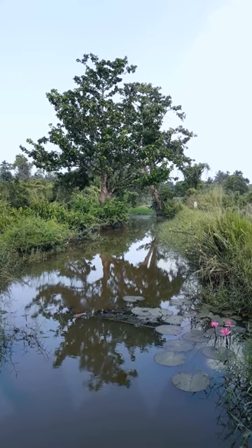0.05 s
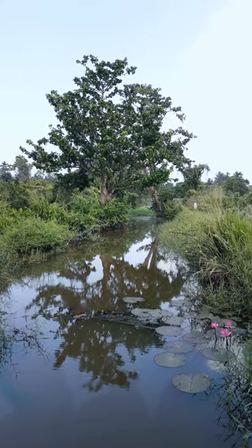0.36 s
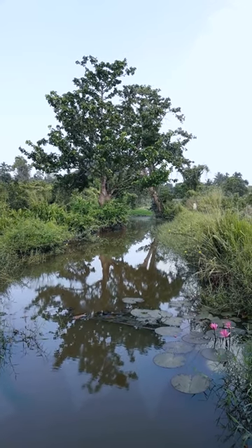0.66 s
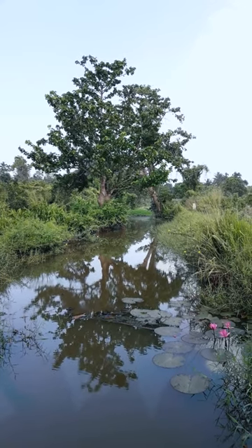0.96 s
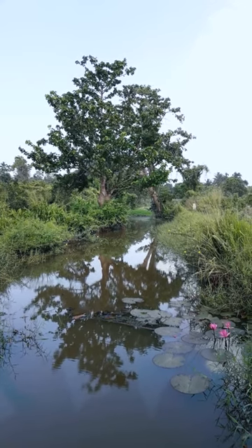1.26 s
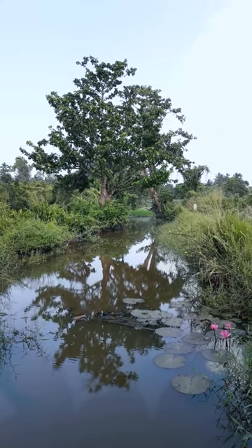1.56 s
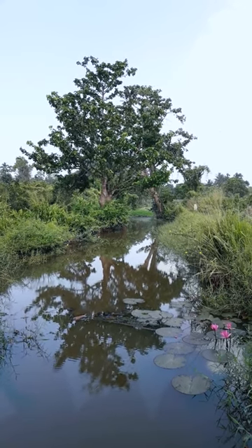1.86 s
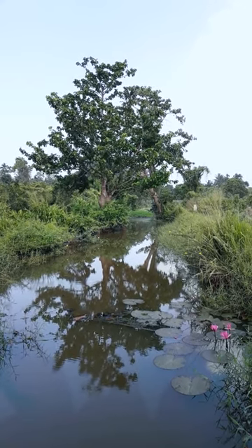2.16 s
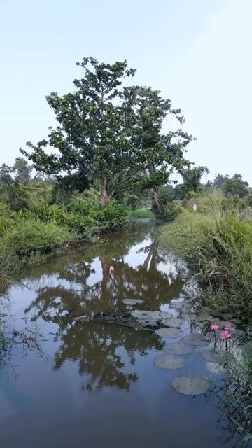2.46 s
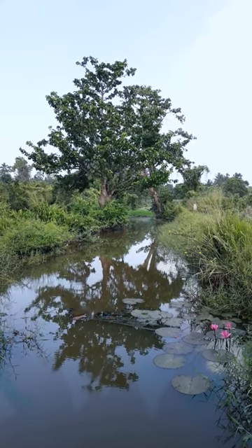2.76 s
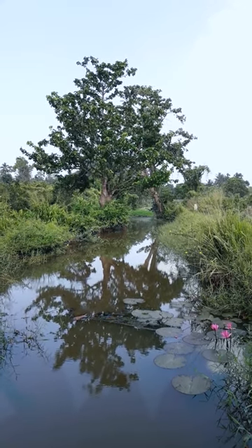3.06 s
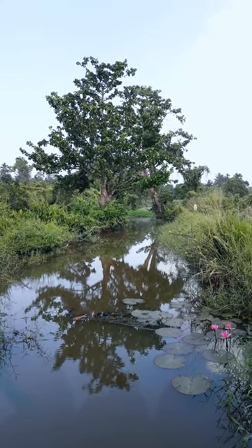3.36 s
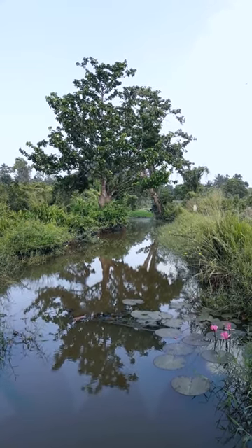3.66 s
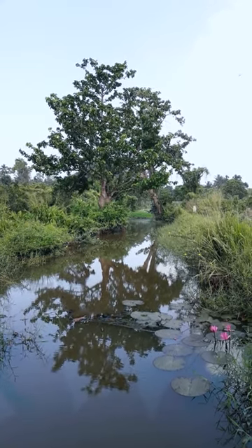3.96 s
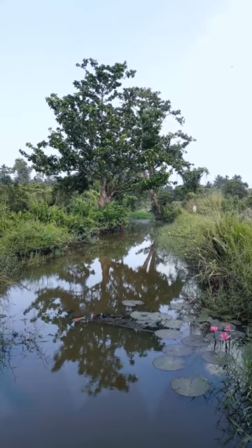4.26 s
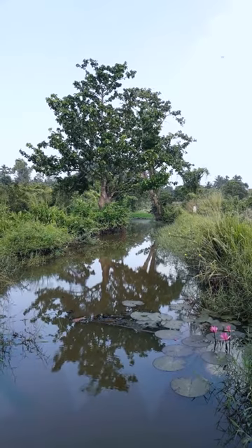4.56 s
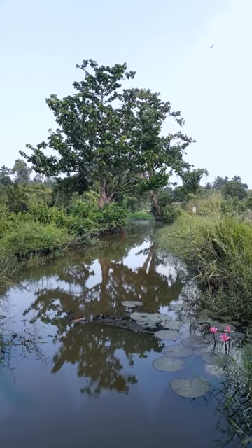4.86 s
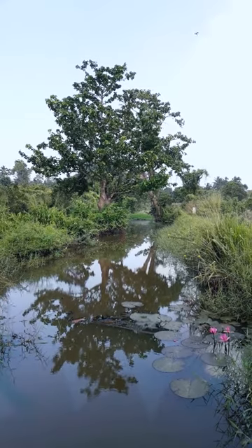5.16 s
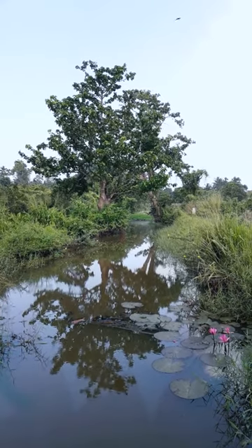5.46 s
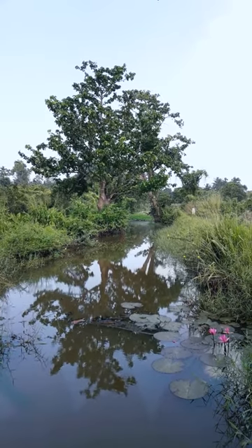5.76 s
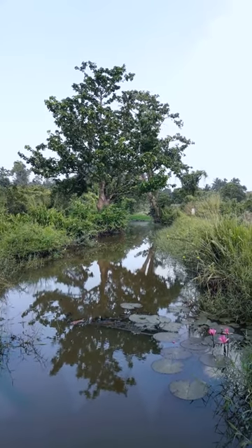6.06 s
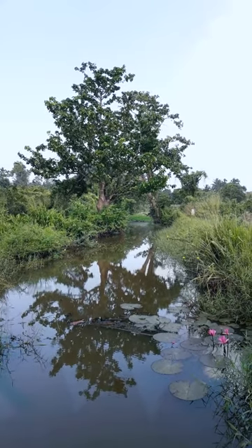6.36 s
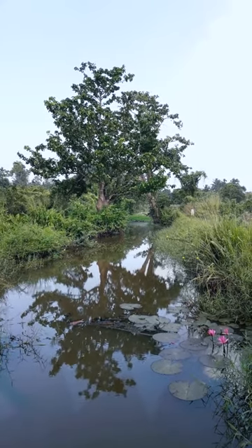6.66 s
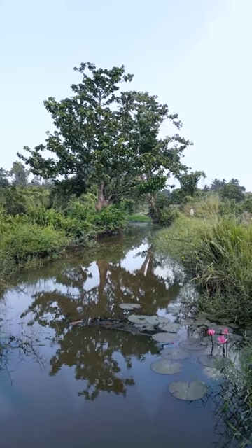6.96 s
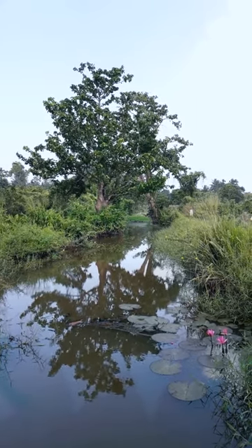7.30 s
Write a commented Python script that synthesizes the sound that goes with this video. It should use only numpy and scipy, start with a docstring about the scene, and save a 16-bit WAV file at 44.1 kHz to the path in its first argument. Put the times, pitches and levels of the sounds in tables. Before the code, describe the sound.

Small birds chirp, chatter and whistle over a steady high insect drone beside a still canal, with a brief grass rustle near the end.

```python
"""A still canal among reeds and trees. Insects drone at 7 kHz throughout, a higher one chirps in pulses,
and small birds peep, twitter and rasp further off. A near bird chatters and a farther one squawks in the
bushes, both with bursts of high hiss. Wood bumps, two slurs fall from distant trees, and the near bird
whistles twice. From 5 s the bush bird repeats rough falling syllables over a far sinking tone, then a far
animal calls hoarsely twice. Last, grass rustles and wood bumps by the microphone. Foliage scatters calls."""
import sys
import numpy as np
from scipy import signal
from scipy.fft import rfft, irfft, next_fast_len
from scipy.io import wavfile
from scipy.ndimage import uniform_filter1d, map_coordinates

SR = 44100
rng = np.random.default_rng(int(sys.argv[2]) if len(sys.argv) > 2 else 0)


def master(y):
    """Save y as 16-bit WAV."""
    cut = np.clip(np.atleast_2d(y).T, -1, 1)
    pcm = np.round(cut * 32767)  # scale
    wavfile.write(sys.argv[1], SR, pcm.astype(np.int16))


N = 327663


def amp(db):
    """Decibels to gain."""
    return 10 ** (np.asarray(db) / 20)


def unit(x):
    """Scale to rms 1."""
    return x / np.sqrt(np.mean(x ** 2) + 1e-20)


def along(points, hz):
    """Read (hz, value) points on a log frequency axis."""
    point_hz, values = np.transpose(points)
    return np.interp(np.log(hz + 1), np.log(point_hz + 1), values)


def clock(length=None):
    """Sample times over a length in seconds, or over the whole scene."""
    return np.arange(N if length is None else int(length * SR)) / SR


def wobble(rate):
    """A smooth random curve, rate knots a second."""
    return map_coordinates(rng.standard_normal(8192), [clock() * rate], order=2, mode="wrap")


def filtered(x, response):
    """Filter x by a gain that depends on frequency."""
    n = x.shape[-1]
    padded = next_fast_len(n + 4096)
    return irfft(rfft(x, padded) * response(np.fft.rfftfreq(padded, 1 / SR)), padded)[..., :n]


def coloured(x, spectrum):
    """x through a (hz, db) spectrum, at rms 1."""
    return unit(filtered(x, lambda hz: amp(along(spectrum, hz))))


def band(centre_hz, width_hz, size):
    """Noise of rms 1 in one bell-shaped band."""
    noise = rng.standard_normal(size)
    return unit(filtered(noise, lambda hz: np.exp(-((hz - centre_hz) / width_hz / 2) ** 2)))


def patchy(depth_db=2.5):
    """White noise with drifting patches of gain."""
    spectra = signal.stft(rng.standard_normal(N), nperseg=512)[2]
    patches = uniform_filter1d(uniform_filter1d(rng.standard_normal(spectra.shape), 4, 0), 16, 1)
    return signal.istft(spectra * amp(depth_db * unit(patches)), nperseg=512)[1][:N]


def add(track, start_s, sound):
    """Mix a sound into a track."""
    part = track[max(round(start_s * SR), 0):][:len(sound)]
    part += sound[:len(part)]


def contour(rows):
    """Start time, pitch and soft-edged gain of one call."""
    times, hz, db = np.transpose(rows)
    t = times[0] + clock(max(times[-1] - times[0], .01))
    pitch = uniform_filter1d(np.interp(t, times, hz), size=300)
    return times[0], pitch, amp(np.interp(t, times, db)) * signal.windows.tukey(len(t), .1)


def repeats(shape, calls):
    """One call shape, moved to each time, length, pitch and level."""
    return [[(start + t * stretch, hz * ratio, db + level) for t, hz, level in shape]
            for start, stretch, ratio, db in calls]


def tone(hz, overtone_db=-30):
    """A gliding sine of rms 1 plus a weaker octave."""
    phase = 2 * np.pi * np.cumsum(hz) / SR
    return np.sqrt(2) * (np.sin(phase) + amp(overtone_db) * np.sin(2 * phase))


def chirp(length, start_hz, middle_hz, end_hz, jitter):
    """One swelling note on an arc through three pitches; fast pitch jitter makes it harsh."""
    progress = np.linspace(0, 1, int(max(length, .005) * SR))
    hz = np.polyval(np.polyfit([0, .5, 1], [start_hz, middle_hz, end_hz], 2), progress)
    shake = np.interp(np.arange(len(progress)) / 50, np.arange(512), rng.standard_normal(512))
    return np.sin(np.pi * progress) * tone(hz * (1 + jitter * shake), overtone_db=-46)


# Decay among the trees on the bank: frequency_hz, t60_s
TREE_DECAY = [(300, 1), (1200, 0.26), (4000, 0.5), (10000, 0.081)]

def foliage(x, wet_db, early_s, late_db, echoes=40):
    """Direct sound, echoes off near trunks and leaves, and a tail; paths change every half second."""
    out, t, hop = x.copy(), clock(.5), SR // 2
    for start in range(0, N, hop):
        hz, when, spectra = signal.stft(rng.standard_normal(len(t)), SR, nperseg=256)
        decay = amp(-60 * when / along(TREE_DECAY, hz)[:, None])
        late = signal.istft(spectra * decay, SR, nperseg=256)[1][:len(t)] * np.minimum(t / .018, 1)
        delays = rng.integers(SR // 250, SR // 12, echoes)
        early = np.bincount(delays, rng.standard_normal(echoes), len(t)) * amp(-60 * t / early_s)
        response = unit(unit(early) + amp(late_db) * unit(late)) / np.sqrt(len(t))
        add(out, start / SR, amp(wet_db) * signal.fftconvolve(x[start:start + hop], response))
    return out / np.sqrt(1 + amp(wet_db) ** 2)


# Swells of the low rumble: time_s, relative_db
RUMBLE_SWELLS = [(0, -61.5), (1.76, -59.5), (1.95, -52.5), (2.5, -57.5), (3.12, -54), (3.75, -59),
                 (4.4, -58.5), (4.95, -54.5), (5.45, -60), (6.6, -57), (7.43, -59)]
# Spectra of the rumble, the far land and the meadow: frequency_hz, gain_db
RUMBLE_SPECTRUM = [(15, -56), (25, -28), (43, -13), (58, -8), (75, -8.5), (102, -2.5), (150, -2), (204, -9),
                   (268, -20), (291, -12.5), (420, -39.5), (550, -53), (920, -120)]
LAND_SPECTRUM = [(210, -18), (350, -5.5), (471, -7), (486, -0.5), (633, -4.5), (681, 0.5), (777, 3.5),
                 (865, -3.5), (1340, 3.5), (1450, -3), (1680, 5.5), (1810, -4), (2160, -1.5), (2360, -21),
                 (2500, -38.5), (3250, -51), (5500, -120)]
MEADOW_SPECTRUM = [(2000, -40), (2500, -20.5), (3100, -2), (4200, 8), (5700, -4.5), (8100, -3), (9000, 3.5),
                   (10000, 2.5), (10800, -4), (12000, -9.5), (13500, -6.5), (15500, -1.5)]

def background(meadow_db=-50, land_db=-59, hum_db=-65, hum_hz=75):
    """Rumble, a faint engine hum, the murmur of the far land and the high hiss of the meadow."""
    swell_db = np.interp(clock(), *np.transpose(RUMBLE_SWELLS))
    rumble = amp(swell_db - 1) * coloured(rng.standard_normal(N), RUMBLE_SPECTRUM)
    hum = amp(hum_db + 4.4 * wobble(3.34)) * tone(hum_hz * (1 + .0143 * wobble(4.9)), overtone_db=-10)
    land = amp(land_db) * coloured(patchy(), LAND_SPECTRUM)
    meadow = amp(meadow_db + .75 * wobble(3.45)) * coloured(patchy(), MEADOW_SPECTRUM)
    return rumble + hum + land + meadow


# Resonance of the droning insects: frequency_hz, gain_db
INSECT_RESONANCE = [(3530, -45.5), (6000, -18), (6140, -19.5), (6660, 2), (6990, 7.5), (7300, -1.5),
                    (7850, -21.5), (8100, -23.5), (10500, -78), (17800, -120)]
# The nearest of them: pulse_rate_hz, relative_db
NEAR_INSECTS = [(77, -7.5), (74.3, -11.5), (48.6, -25)]

def insects(drone_db=-37.5, chorus_db=-2, high_db=-60, chirp_rate_hz=8.7):
    """Three near insects pulse over a blended chorus in one resonance; a higher one chirps."""
    def pulse(rate_hz, drift):
        return (.5 + .5 * np.cos(2 * np.pi * (rate_hz * clock() + drift * wobble(2.034)))) ** 2

    near_power = sum(amp(db) ** 2 * 4 * pulse(rate_hz, .072) ** 3 for rate_hz, db in NEAR_INSECTS)
    buzz = np.sqrt(amp(chorus_db) ** 2 + near_power) * rng.standard_normal(N)
    drone = coloured(buzz, INSECT_RESONANCE) * amp(drone_db + .6 * wobble(6.5))
    chirping = (.5 + pulse(chirp_rate_hz, .17)) * (1 + pulse(71.5, .1))
    return drone + amp(high_db) * unit(band(9590, 270, size=N) * chirping)


# A far animal's throat: frequency_hz, gain_db
THROAT_SPECTRUM = [(250, -23), (400, -15.5), (520, -9), (620, 9.5), (700, -6), (790, 1), (930, -0.5),
                   (1170, 6), (1350, -9), (1600, -1.5), (2000, -25), (3000, -52)]
# Its hoarse call: offset_s, pitch_hz, relative_db
CAW_SHAPE = [(0, 320, -17), (.047, 371.4, -1), (.078, 376.4, 1), (.112, 362, -13.5), (.18, 354.4, -12)]
# Each call: start_s, stretch_ratio, pitch_ratio, level_db
CAW_REPEATS = [(6.203, 0.98, 1.04, -36.5), (6.468, 1.38, .98, -39.5)]

def far_caws(jitter=.032, breath=.91):
    """Uneven pulses and breath noise pass through the throat of a far animal."""
    out, flutter = np.zeros(N), 1 + jitter * wobble(300)
    for rows in repeats(CAW_SHAPE, CAW_REPEATS):
        start, hz, gain = contour(rows)
        cycles = np.cumsum(hz * flutter[round(start * SR):][:len(hz)]) / SR
        pulses = unit(np.diff(np.floor(cycles), prepend=0))
        add(out, start, gain * coloured(pulses + breath * rng.standard_normal(len(hz)), THROAT_SPECTRUM))
    return out


# Two low voices, far off: time_s, pitch_hz, level_db
LOW_WARBLE = [(5.92, 930, -63), (5.94, 922, -45), (5.985, 873, -44), (6.015, 890, -41.5),
              (6.065, 902, -45.5), (6.085, 900, -68)]
SINKING_TONE = [(4.85, 847, -69), (5.22, 809, -65.5), (5.55, 743, -63.5), (5.85, 712, -77)]

def far_voices(quaver_hz=28):
    """Far animals give a short warble, quavering in pitch and level, and a long sinking tone."""
    out = np.zeros(N)
    start, hz, gain = contour(LOW_WARBLE)
    quaver = -np.cos(2 * np.pi * quaver_hz * np.arange(len(hz)) / SR)
    add(out, start, gain * amp(2.8 * quaver) * tone(hz + 30 * quaver))
    start, hz, gain = contour(SINKING_TONE)
    add(out, start, gain * tone(hz + 7 * wobble(39.4)[:len(hz)]))
    return out


def far_chorus(count=30, centre_hz=4250, level_db=-52):
    """Many far birds twitter at random in short arched notes."""
    out, starts = np.zeros(N), rng.uniform(0, N / SR, count)
    for start, (stretch, pitch, slope, loud) in zip(starts, rng.standard_normal((count, 4))):
        hz, glide = centre_hz * np.exp(.06 * pitch), np.exp(.055 * slope)
        note = chirp(.03 * np.exp(.3 * stretch), hz / glide, hz * 1.04, hz * glide, jitter=0)
        add(out, start, amp(level_db + 2 * loud) * note)
    return out


# Harsh falling notes, deep in the trees: start_s, length_s, middle_hz, level_db
TREE_TSIPS = [(0.561, .028, 3490, -33.5), (0.995, 0.038, 3406, -33.5), (2.099, .05, 5420, -48),
              (2.202, 0.052, 5360, -52), (2.412, .037, 5700, -50), (2.742, 0.027, 5400, -45),
              (4.256, .05, 4320, -42.5)]
# Rasps and scuffs there: start_s, length_s, centre_hz, level_db
TREE_RASPS = [(.05, 0.012, 6200, -33.5), (0.062, 0.021, 2870, -39.5), (0.884, 0.056, 1280, -48),
              (2.887, 0.036, 4670, -32), (4.444, 0.038, 4330, -43.5), (5.505, 0.018, 5400, -39.5),
              (5.853, 0.055, 4540, -32), (5.86, 0.042, 1820, -47), (6.157, 0.06, 4940, -36),
              (6.169, 0.037, 1700, -48), (7.242, 0.016, 1370, -39)]

def tree_birds():
    """Small birds in the trees give jittery falling whistles and rasps of band noise."""
    out = np.zeros(N)
    for start, length, hz, db in TREE_TSIPS:
        add(out, start, amp(db) * chirp(length, 1.14 * hz, hz, .78 * hz, jitter=.056))
    for start, length, hz, db in TREE_RASPS:
        swell = np.sin(np.pi * clock(length) / length)
        add(out, start, amp(db) * swell * band(hz, width_hz=.17 * hz, size=8192)[:len(swell)])
    return out


# Short rising notes in the open reeds: start_s, level_db
REED_WITS = [(.306, -41.5), (0.893, -42.5), (1.24, -43), (1.384, -44.5), (1.615, -42)]
# Thin, almost level notes: start_s, length_s, level_db
REED_PEEPS = [(.225, 0.062, -45), (.705, .025, -45), (1.007, 0.05, -40.5), (2.103, 0.15, -49),
              (3.044, 0.096, -42.5), (3.137, .06, -53),  (4.309, 0.049, -42), (4.731, 0.072, -43),
              (5.901, 0.078, -36), (7.028, 0.058, -43.5), (7.26, 0.067, -49)]
# Glides of farther birds: start_s, length_s, start_hz, middle_hz, end_hz, level_db
REED_GLIDES = [(.788, .09, 1724, 1638, 1600, -53), (2.59, 0.2, 2730, 2806, 2600, -59),
               (2.86, 0.113, 2980, 2924, 2940, -52), (3.111, 0.18, 1650, 1818, 1816, -55),
               (3.998, 0.26, 5440, 5430, 4230, -52), (4.803, .3, 3570, 3415, 3770, -52),
               (4.875, 0.079, 4200, 4400, 4600, -50), (7.078, 0.067, 1070, 1462, 1200, -43),
               (7.259, 0.066, 1150, 1340, 1310, -53)]

def reed_birds():
    """Small birds in the reeds whistle single wavering notes."""
    out = np.zeros(N)
    for start, db in REED_WITS:
        add(out, start, amp(db) * chirp(.0141, 2640, 3220, 3560, jitter=.061))
    for start, length, db in REED_PEEPS:
        add(out, start, amp(db) * chirp(length, 4000, 4102, 4213, jitter=.013))
    for start, length, *arc_hz, db in REED_GLIDES:
        add(out, start, amp(db) * chirp(length, *arc_hz, jitter=.019))
    return out


# Twittering at middle distance: start_s, note_count, reference_hz, level_db
TWITTER_RUNS = [(3.771, 3, 4510, -47.5), (4.977, 2, 4040, -48.5), (5.165, 2, 4480, -43),
                (6.184, 3, 4610, -38.5), (6.32, 1, 5000, -39), (6.55, 2, 4400, -46.5),
                (6.848, 1, 4270, -48), (6.921, 3, 4510, -45)]

def twitters(note_s=.0251, step_s=.047, arch_ratios=(.76, .95, .91)):
    """Small birds whistle runs of evenly spaced arched notes, each at a slightly different pitch."""
    out = np.zeros(N)
    for start, notes, hz, db in TWITTER_RUNS:
        for k in range(notes):
            arc_hz = hz * np.exp(.0298 * rng.standard_normal()) * np.array(arch_ratios)
            add(out, start + k * step_s, amp(db) * chirp(note_s, *arc_hz, jitter=.0086))
    return out


def sing(calls, rough, overtone_db):
    """A bird's syrinx slides through each call; roughness shakes both pitch and strength."""
    out = np.zeros(N)
    tremor = 1 + .055 * rough * wobble(700)
    flutter = amp(4 * rough * wobble(300) - rough)
    for rows in calls:
        start, hz, gain = contour(rows)
        span = round(start * SR) + np.arange(len(hz))
        add(out, start, gain * flutter[span] * tone(hz * tremor[span], overtone_db))
    return out


# Slurs from distant trees: time_s, pitch_hz, level_db
LOWER_SLUR = [(2.805, 3770, -35), (2.825, 3760, -32.5), (2.848, 3450, -43.5), (2.865, 2940, -38),
              (2.92, 2225, -73)]
UPPER_SLUR = [(2.835, 5670, -49), (2.88, 4950, -37.5), (2.916, 4536, -29.5), (2.954, 4280, -32),
              (3.02, 4070, -60)]

def distant_slurs():
    """Two overlapping whistles fall, their overtones almost lost over the distance."""
    return sing([LOWER_SLUR, UPPER_SLUR], rough=.55, overtone_db=-42)


# Spectra of a thin and a fuller hiss: frequency_hz, gain_db
THIN_SPECTRUM = [(7000, -25), (11000, -7), (14500, -2), (15800, -2.5)]
FULL_SPECTRUM = [(2500, -21), (5000, -1), (8500, 4), (11500, -35), (15800, -13)]
# Three bursts of hiss with the bird calls, then two grass rustles: start_s, length_s, level_db, thin_share
HISS_BURSTS = [(0.034, 0.28, -46.5, 0.35), (.335, .135, -40, 0.18), (3.423, .11, -47, 0.2),
               (6.63, 0.34, -51.5, 0.8), (6.94, 0.17, -45.5, 1)]
# Grass snaps: start_s, relative_db, body_relative_db
GRASS_SNAPS = [(1.8254, -44, 1), (4.843, -39.5, 3), (4.9834, -36, -2), (6.7574, -40.5, 6.5),
               (6.784, -27, 2), (6.906, -35, -6), (6.951, -35, -11), (7.0466, -21.5, -26),
               (7.0618, -29, -6)]

def hiss_and_grass(attack_s=.025, release_s=.035, snap_t60_s=.037):
    """Grainy high hiss comes with early calls; close grass snaps now and then and rustles after 6.6 s."""
    thin, full = [coloured(rng.standard_normal(N) * amp(3.2 * wobble(400)), spectrum)
                  for spectrum in (THIN_SPECTRUM, FULL_SPECTRUM)]
    out, now, t = np.zeros(N), clock(), clock(.028)
    for start, length, db, share in HISS_BURSTS:
        fade = np.clip(np.minimum((now - start) / attack_s, (start + length - now) / release_s), 0, 1)
        out += amp(db) * fade * (np.sqrt(share) * thin + np.sqrt(1 - share) * full)
    for start, db, body_db in GRASS_SNAPS:
        crack = coloured(rng.standard_normal(len(t)), THIN_SPECTRUM)
        body = amp(body_db - 3) * band(5600, 2400, size=len(t))
        add(out, start, amp(db - 6 - 60 * t / snap_t60_s) * (crack + body))
    return out


# Modes of the wood: frequency_hz, gain_db, t60_s
WOOD_MODES = [(332, -11, 0.3), (531, 3.5, 0.037), (634, 8, 0.035), (848, -1, 0.067), (1100, -10, 0.07),
              (1327, 7.5, 0.024)]
# Dull bumps near the microphone: start_s, level_db
WOOD_BUMPS = [(1.795, -45), (1.817, -40), (6.786, -46.5), (7.247, -41.5)]

def wood_bumps(attack_s=.0018):
    """Each bump rings a few damped modes at new strengths."""
    out, t = np.zeros(N), clock(.2)
    for start, db in WOOD_BUMPS:
        ring = sum(amp(level + 2 * rng.standard_normal() - 60 * t / t60) * np.sin(2 * np.pi * hz * t)
                   for hz, level, t60 in WOOD_MODES)
        add(out, start, amp(db) * ring * (1 - np.exp(-t / attack_s)))
    return out


# One loud squawk from the bushes: time_s, pitch_hz, level_db
LOUD_SQUAWK = [(.340, 4180, -40), (.352, 3770, -21), (.362, 3115, -22.5), (.377, 2900, -38),
               (.405, 2830, -36), (.42, 2290, -41), (.437, 1800, -35), (.453, 1616, -32.5),
               (.463, 1540, -50)]
# Syllables; the chip rises and steps down, the drop lands on a shelf: offset_s, pitch_hz, relative_db
CHIP_SHAPE = [(0, 3624, -10), (.014, 4240, 3.5), (.025, 4400, -12), (.035, 3420, 2.5), (.053, 3290, -6.5),
              (.082, 3030, -13), (.115, 2130, -24)]
DROP_SHAPE = [(0, 4850, 2), (.018, 4450, -6), (.03, 3260, -1), (.042, 2400, -15), (.064, 2293, 0),
              (.1, 2223, -7)]
# Each syllable: start_s, stretch_ratio, pitch_ratio, level_db
CHIP_REPEATS = [(5.309, .97, 1.017, -33), (5.499, .96, 0.96, -33), (5.691, 1, 1.025, -31)]
DROP_REPEATS = [(5.187, 0.77, .94, -45), (5.994, 1.04, 1.005, -36.5), (6.35, 1.05, 1.005, -35.5)]

def bush_bird():
    """A farther bird in the bushes squawks, and later repeats rough falling syllables."""
    syllables = repeats(CHIP_SHAPE, CHIP_REPEATS) + repeats(DROP_SHAPE, DROP_REPEATS)
    return sing([LOUD_SQUAWK] + syllables, rough=1, overtone_db=-28)


def near_chatter(low_hz=1620, high_hz=2330, low_db=-38, high_db=-34, pairs=7):
    """The near bird runs through fast raspy pairs: a short high blip, then a low dipping note."""
    out = np.zeros(N)
    beats = .098 + .0278 * np.arange(pairs) + .001 * rng.standard_normal(pairs)
    for start, swell in zip(beats, np.sin(np.linspace(.6, 2.9, pairs))):
        blip = chirp(.013, high_hz * .88, high_hz, high_hz * .93, jitter=.04)
        dip = chirp(.018, low_hz * 1.2, low_hz, low_hz * 1.05, jitter=.05)
        add(out, start, swell * amp(high_db) * blip)
        add(out, start + .011, swell * amp(low_db) * dip)
    return out


# The near bird's whistle: offset_s, pitch_hz, relative_db
WHISTLE_SHAPE = [(0, 3140, -16), (.015, 3427, -5), (.026, 2744, -31), (.036, 2400, -10), (.047, 2190, 1.5),
                 (.07, 2090, -5.5), (.1, 2168, -6.5), (.123, 1520, -6), (.138, 1210, -19)]
# Each whistle: start_s, stretch_ratio, pitch_ratio, level_db
WHISTLE_REPEATS = [(3.412, 0.97, 1.005, -28.5), (3.999, 1, .995, -33.5)]

def near_whistles():
    """The near bird whistles twice, almost purely: a blip, a break, a shelf and a fall."""
    return sing(repeats(WHISTLE_SHAPE, WHISTLE_REPEATS), rough=.15, overtone_db=-22)


def scene():
    """From the bank, every source reaches both microphone channels alike, save a trace of high hiss."""
    whistles, song, slurs = near_whistles(), bush_bird(), distant_slurs()
    near = foliage(whistles + near_chatter() + wood_bumps(), wet_db=-4.5, early_s=.084, late_db=-7.5)
    bushes = foliage(song, wet_db=2, early_s=.15, late_db=-14)
    distant = foliage(slurs, wet_db=3, early_s=.2, late_db=2)
    far = foliage(far_caws() + far_voices(), wet_db=-6.5, early_s=.18, late_db=-10.5)
    clean, harsh = reed_birds(), tree_birds()
    reeds = foliage(clean + far_chorus(), wet_db=-5, early_s=.032, late_db=4)
    runs = foliage(twitters(), wet_db=-6.5, early_s=.066, late_db=5)
    trees = foliage(harsh, wet_db=-1.5, early_s=.13, late_db=-1)
    scattered = near + bushes + reeds + runs + trees + distant + far
    mid = scattered + insects() + hiss_and_grass() + background()
    side = amp(-67.5) * band(15000, 2800, size=N)
    return np.array([mid + side, mid - side])


def record(dry):
    """The recorder keeps nothing above 15.8 kHz."""
    return filtered(dry, lambda hz: hz < 15800)


dry = scene()
out = record(dry)
master(out)
```